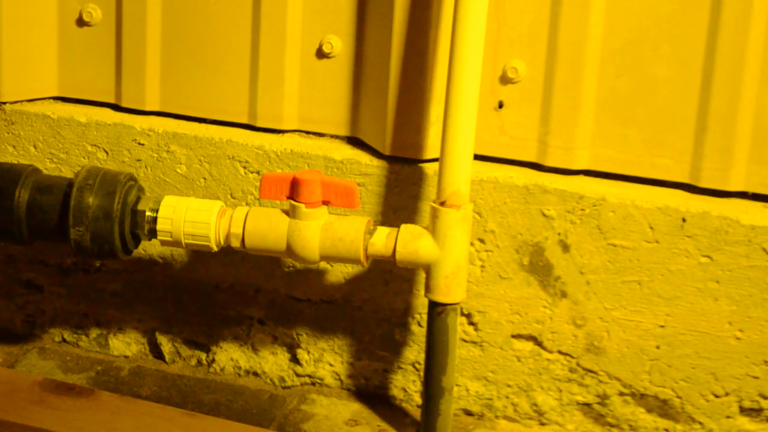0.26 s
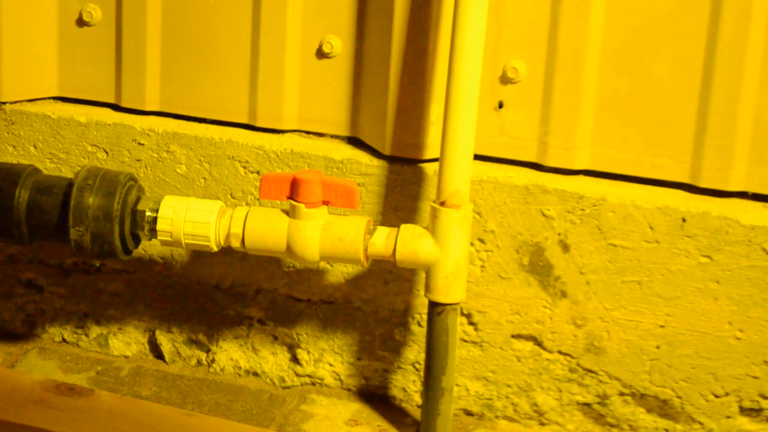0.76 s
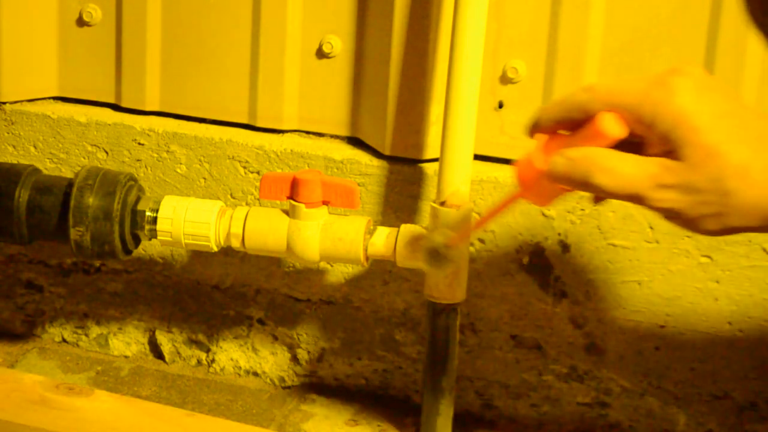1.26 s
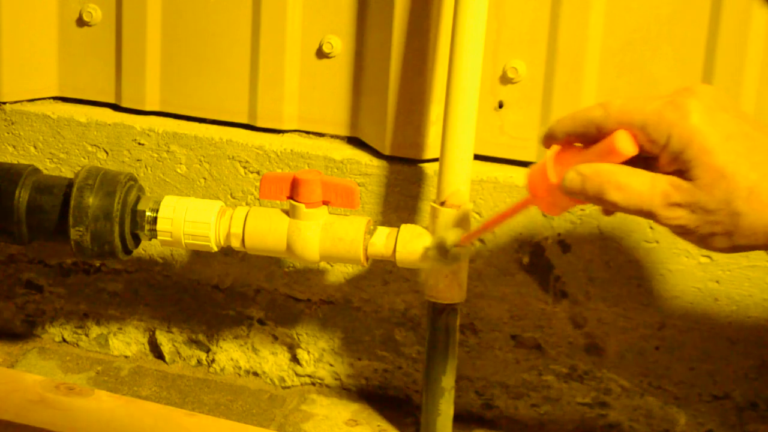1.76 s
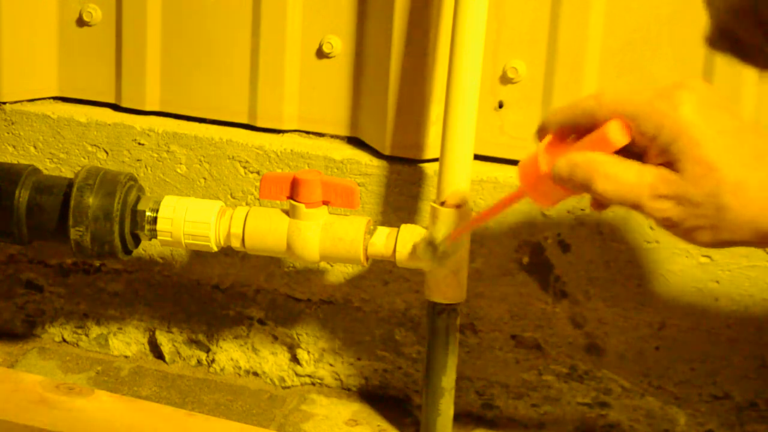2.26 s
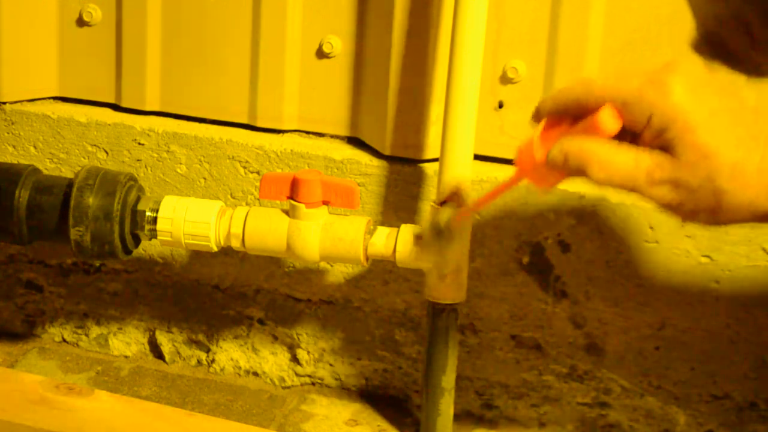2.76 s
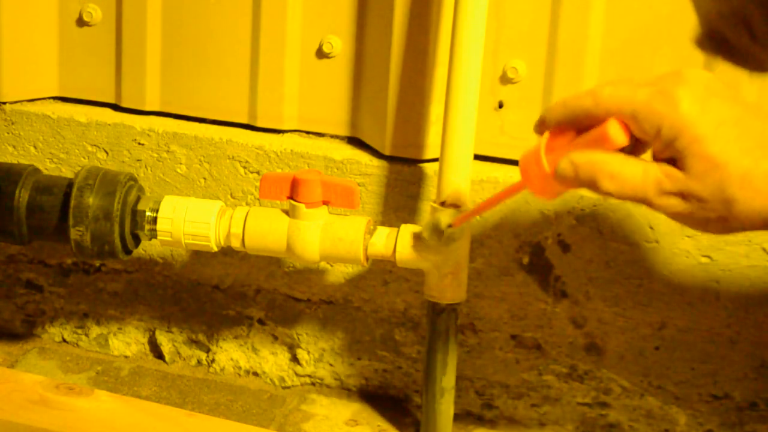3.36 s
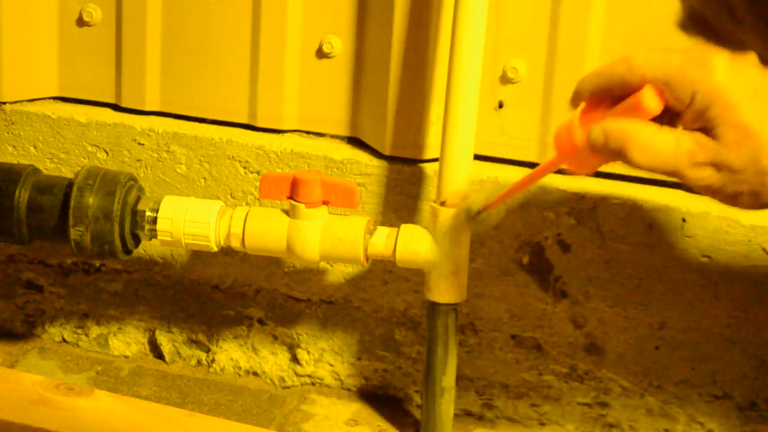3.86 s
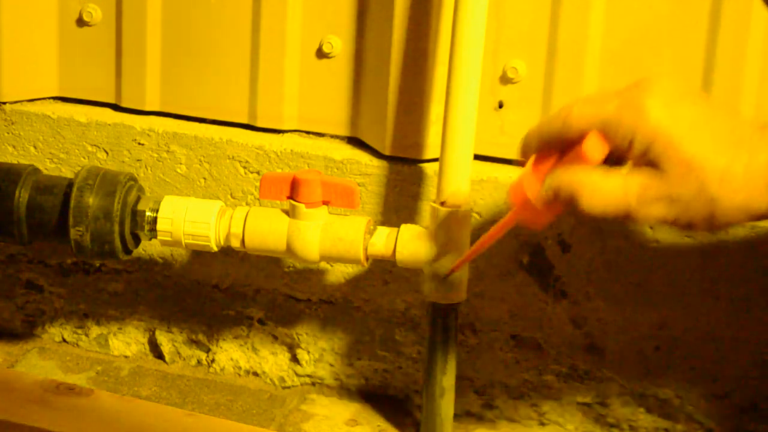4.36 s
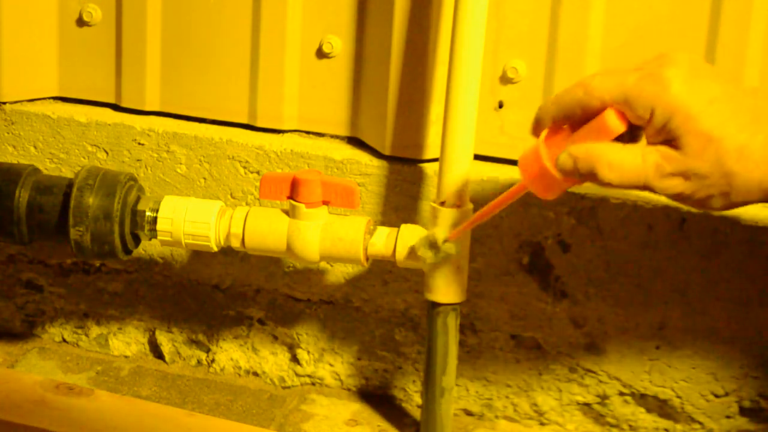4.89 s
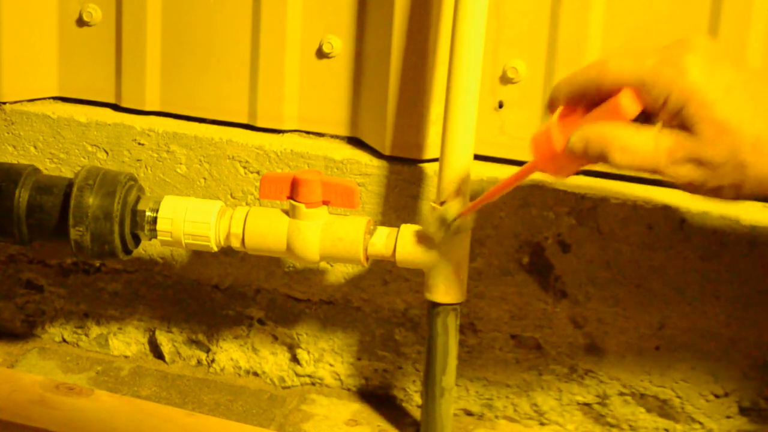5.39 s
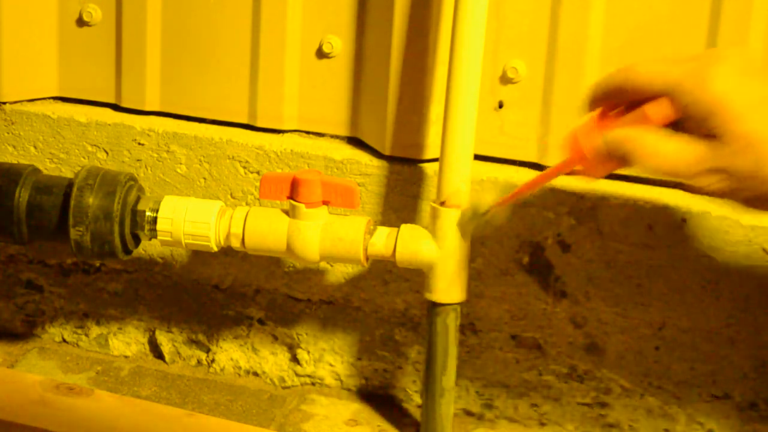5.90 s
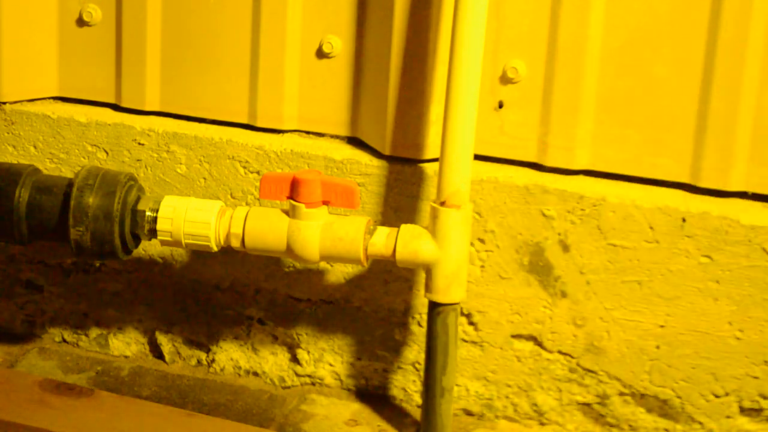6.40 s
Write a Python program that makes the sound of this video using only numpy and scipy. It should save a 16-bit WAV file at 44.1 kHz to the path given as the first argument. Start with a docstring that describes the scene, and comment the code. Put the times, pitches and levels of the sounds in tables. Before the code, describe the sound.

A blower is already running at the start, loud and close in a hard-walled room. It has a strong, steady mid-pitched tone with overtones, a low motor hum, several thin whines above it and a rush of air through the housing. At about 0.6 seconds the volume drops abruptly from loud to quiet. The blower does not slow or change pitch; the same drone simply carries on at the lower level until the end, near 6.5 seconds. Soft, low handling bumps with no ring come at about 3.1 and 3.7 seconds. The main tone swells slightly between 4.2 and 4.7 seconds and stays there. More dull bumps cluster from about 4.9 to 5.8 seconds, and a last pair falls near 6.3 seconds, all faint beneath the running blower.

```python
"""Steady blower, volume cut abruptly

A blower runs steadily close by in a hard-walled room: its blades chop out a strong tone with overtones,
the motor hums, thin whines sit above it and air rushes through the housing. After about half a second the
volume is cut from loud to quiet while the blower runs on. Later, soft low handling bumps come and go."""
import sys
import numpy as np
from scipy.fft import rfft, irfft, next_fast_len
from scipy.io import wavfile
from scipy.ndimage import map_coordinates

SR = 44100
rng = np.random.default_rng(int(sys.argv[2]) if len(sys.argv) > 2 else 0)


def unload_audio(sound):
    """Save the sound as a 16-bit wav file, at the path given as the first command line argument."""
    columns = np.transpose(np.atleast_2d(sound))
    # keep every value between -1 and 1, then stretch to whole-number steps
    steps = np.round(np.clip(columns, -1, 1) * 32767)
    wavfile.write(sys.argv[1], SR, steps.astype(np.int16))


N = 292824

BLADE_HZ, DRIFT_HZ, BLADE_COUNT = 405.4, 0.21, 9
DROP_AT_S, DROP_DB, TOP_HZ = .581, 25.5, 15750  # all other levels are those heard after the volume drop


def amp(db):
    """Decibels to gain."""
    return 10 ** (np.asarray(db) / 20)


def unit(x):
    """x scaled to rms 1."""
    return x / np.sqrt(np.mean(x ** 2) + 1e-20)


def along(points, hz):
    """A curve through (Hz, value) points, read on a log frequency axis."""
    freqs, values = np.transpose(points)
    return np.interp(np.log(hz + 1), np.log(freqs + 1), values)


def wobble(rate):
    """A smooth random curve with rate knots a second."""
    knots = rng.standard_normal(int(N * rate / SR) + 4)
    return map_coordinates(knots, [np.arange(N) * rate / SR])


def filtered(x, response):
    """x through an EQ whose gain is response(hz)."""
    size = next_fast_len(N + SR // 2)
    return irfft(rfft(x, size) * response(np.fft.rfftfreq(size, 1 / SR)), size)[:N]


def noise(colour_db):
    """Noise of rms 1, its spectrum shaped by colour_db(hz)."""
    return unit(filtered(rng.standard_normal(N), lambda hz: amp(colour_db(hz))))


def blades(phase, level_db=-43.5, swell_db=2, swell_at_s=4.16, swell_s=0.49):
    """The blades chop the air into a clean tone that swells once; uneven inflow shakes its overtones."""
    # Each row: multiple of the blade tone, level in dB, flutter depth in dB.
    overtones = [(2, -58, 2), (3, -74.5, 3), (4, -77.5, 4.5), (7, -77.5, 0), (11, -90.5, 5.5)]
    swell = np.clip((np.arange(N) / SR - swell_at_s) / swell_s, 0, 1)
    tone = amp(level_db + swell_db * swell + 0.2 * wobble(24)) * np.sin(phase)
    for multiple, db, flutter_db in overtones:
        shaken = multiple * phase + 0.17 * wobble(20) + rng.uniform(0, 2 * np.pi)
        tone += amp(db + flutter_db * wobble(22)) * np.sin(shaken)
    return np.sqrt(2) * tone


def hum_and_whines(hum_hz=120, hum_db=-64, growth_db=3.2, settle_s=.8, waver_db=1.4):
    """Mains hum and its octave grow and settle under steady whines; higher whines wander a little more."""
    # Steady whines, plus a very faint thin whistle at the top of the treble.
    # Each row: pitch in Hz, level in dB.
    whines = [(450.6, -67), (691, -67.5), (976, -74), (1050.6, -64.5), (1096, -71), (1501.6, -71),
              (1622, -74), (1836, -75.5), (3429, -84.5), (3741, -87.5), (4172, -90.5), (6729, -100),
              (8800, -102), (8920, -104), (9042, -107), (15678, -107)]
    t = np.arange(N) / SR
    mains = 2 * np.pi * hum_hz * t
    settling_db = hum_db - growth_db * np.exp(-t / settle_s)
    hum = np.sin(mains) + amp(-10.5) * np.sin(2 * mains)
    tones = amp(settling_db + waver_db * wobble(6.3)) * hum
    for hz, db in whines:
        wander = .3 * np.sqrt(hz / 1000) * wobble(4) + rng.uniform(0, 2 * np.pi)
        tones += amp(db + 1.1 * wobble(9)) * np.sin(2 * np.pi * hz * t + wander)
    return np.sqrt(2) * tones


def housing(hz):
    """Resonances of housing and room lift, and their hollows sink, bell-shaped bands (dB)."""
    # Each row: centre in Hz, width in Hz, boost or cut in dB.
    bands = [(194.4, 36, -6), (260, 51, -10), (295.2, 16.6, 14.5), (345.3, 13, -5.5), (486.6, 46, -6.5),
             (539, 21, -5.5), (643, 22, -3), (740, 80, -6), (970, 43, -1.5), (1107, 25, 2.5),
             (1182, 67, 5.5), (1327, 59, -2.5), (1420, 23, 6), (1690, 25, -4.5), (1699, 48, 5),
             (1817, 120, 5), (2041, 25, 6.5), (2074, 33, -5), (2275, 50, 6), (2326, 59, -4.5),
             (2973, 240, 4), (3140, 76, -5), (3410, 48, 5), (4140, 44, 4), (4600, 120, 3), (5100, 300, 2),
             (5990, 602, -4.5), (6750, 150, 6)]
    return sum(db * np.exp(-(2 * (hz - centre) / width) ** 2) for centre, width, db in bands)


def walls(hz, depth_db=2.5, decay_s=0.046):
    """Many reflections comb the spectrum into fine still ripples (dB), deepest in the midrange."""
    t = np.arange(SR // 4) / SR
    echoes = rng.standard_normal(len(t)) * np.exp(-t / decay_s)
    ripple = np.interp(hz, np.arange(SR // 2 + 1), unit(rfft(echoes, SR).real))
    return depth_db * ripple * hz / (hz + 600) / (1 + (hz / 9500) ** 2)


def airflow(phase, level_db=-48.0):
    """Turbulent air coloured by housing and walls, pulsing slightly with each turn of the shaft."""
    # The colour of the rush. Each row: frequency in Hz, relative level in dB.
    air_colour = [(10, -36), (30, -22), (100, -19.5), (150, -7), (260, -5.5), (380, -2), (650, 0),
                  (1150, -8.5), (1900, -12.5), (2500, -20), (3200, -22.5), (6000, -39), (12000, -49.5),
                  (15700, -56)]
    rush = noise(lambda hz: along(air_colour, hz) + housing(hz) + walls(hz))
    shaft_pulse = 1 + 0.034 * np.sin(phase / BLADE_COUNT)
    return amp(level_db + 0.13 * wobble(3.0) + 0.21 * wobble(25)) * rush * shaft_pulse


def bumps(rise_s=.012, faint_from_s=3.3, faint_per_s=2.5, faint_db=-65.5, scatter_db=2):
    """Each soft handling contact gives a short low push with no ring; fainter ones fall at random."""
    # The clearest bumps. Each row: time of the peak in seconds, peak level in dB.
    clear = [(3.059, -55), (3.659, -56), (4.939, -63), (5.169, -56), (5.329, -59), (5.489, -61),
             (5.734, -54), (5.769, -53), (6.289, -56), (6.344, -56)]
    # The dull colour of a bump. Each row: frequency in Hz, relative level in dB.
    thud_colour = [(12, -25), (30, -4), (55, 1.5), (110, -1), (180, -6), (300, -25), (900, -71)]
    t = np.arange(N) / SR
    slots = np.arange(faint_from_s, N / SR, 1 / faint_per_s)
    faint = [(s + rng.uniform() / faint_per_s, faint_db + scatter_db * rng.normal()) for s in slots]
    out = np.zeros(N)
    for peak_s, db in list(clear) + faint:
        age = np.maximum((t - peak_s) / rise_s + 1, 0)  # in rise times; 1 at the peak
        thud = noise(lambda hz: along(thud_colour, hz)) * age * np.exp(-age)
        out += amp(db) * thud / (np.abs(thud).max() + 1e-20)
    return out


def scene():
    """Blade tone and air share one shaft at a nearly constant speed; hum, whines and bumps lie beneath."""
    phase = 2 * np.pi * np.cumsum(BLADE_HZ + DRIFT_HZ * wobble(1.1)) / SR
    return (blades(phase) + hum_and_whines() + airflow(phase) + bumps())[None]


def record(dry):
    """The volume is cut from loud to quiet within a millisecond; the very top treble is filtered off."""
    loud = np.interp(np.arange(N) / SR, [DROP_AT_S - .001, DROP_AT_S], [1, 0])
    gain = 1 + loud * (amp(DROP_DB) - 1)
    return filtered(dry[0] * gain, lambda hz: hz < TOP_HZ)[None]


dry = scene()
out = record(dry)
unload_audio(out)
```